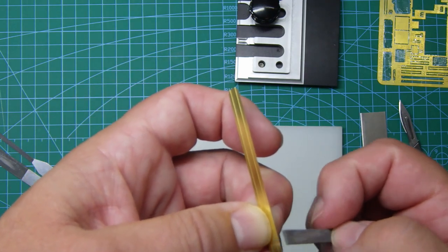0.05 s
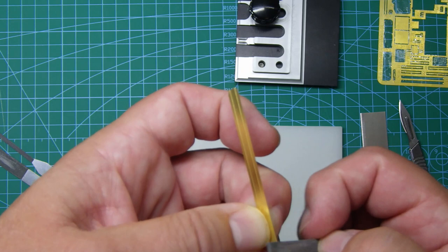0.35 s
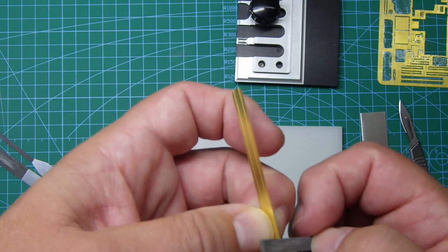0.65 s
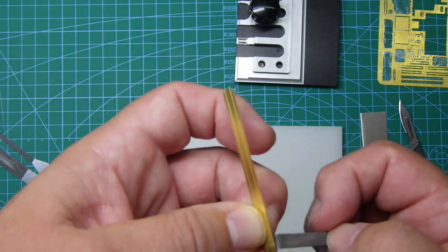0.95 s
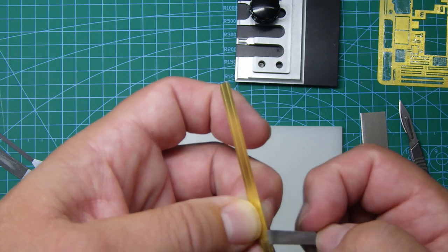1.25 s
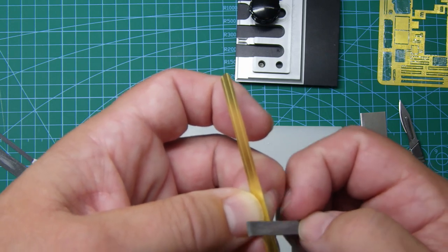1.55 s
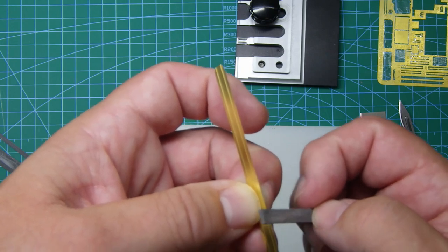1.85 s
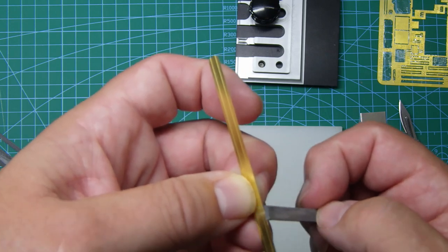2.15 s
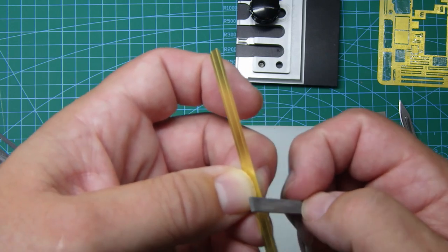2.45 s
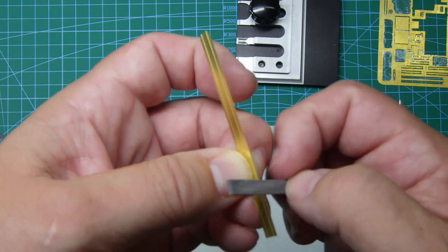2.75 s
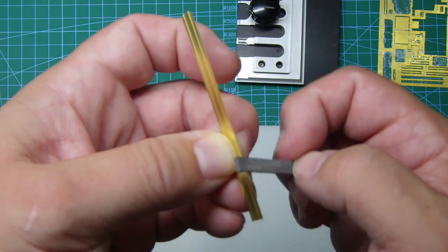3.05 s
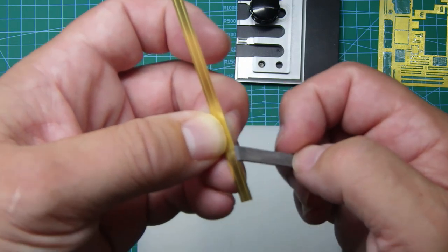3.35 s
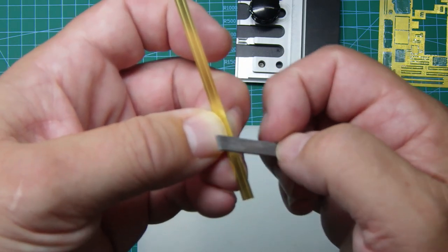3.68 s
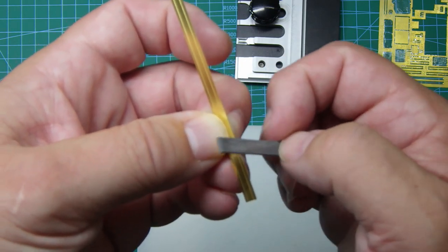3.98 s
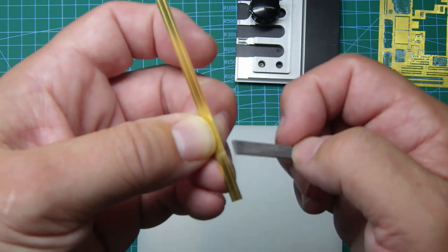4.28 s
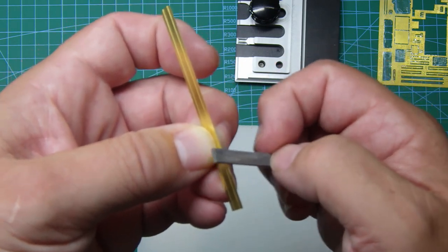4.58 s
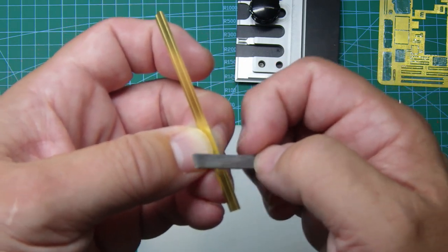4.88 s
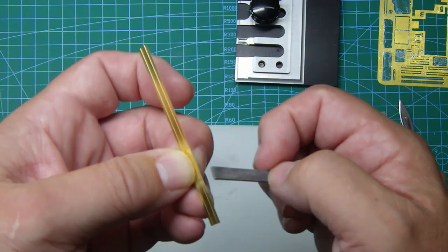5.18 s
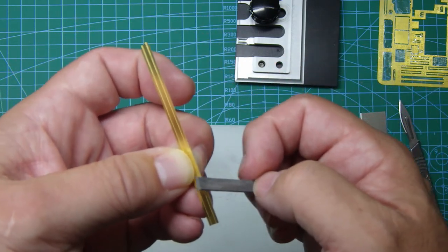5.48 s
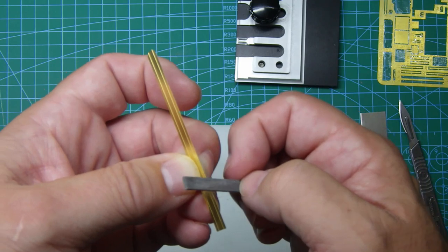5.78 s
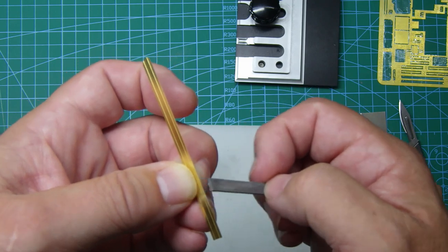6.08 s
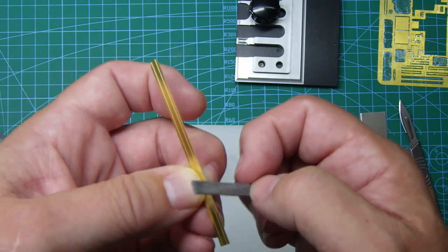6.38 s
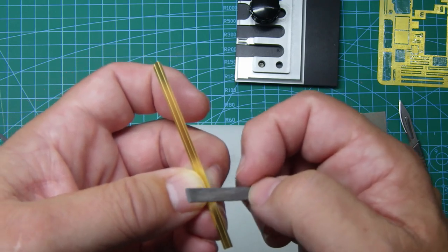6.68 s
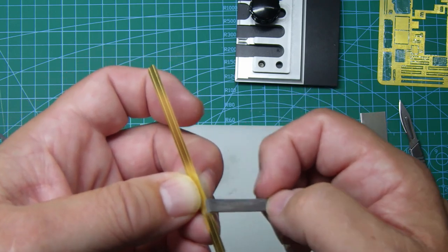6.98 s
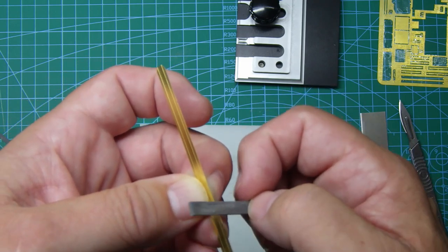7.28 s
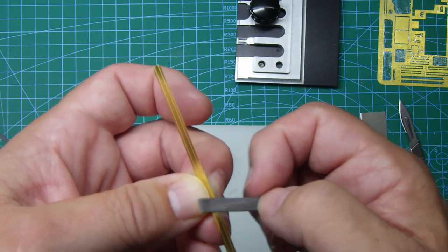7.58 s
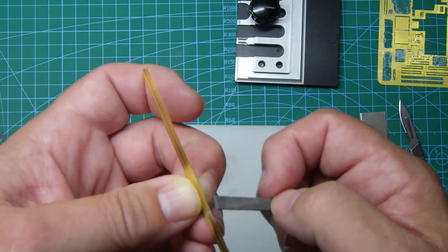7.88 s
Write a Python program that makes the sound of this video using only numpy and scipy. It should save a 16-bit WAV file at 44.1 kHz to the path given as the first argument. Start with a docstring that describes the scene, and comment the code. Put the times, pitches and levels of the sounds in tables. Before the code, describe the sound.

A small sanding stick rasps along a thin brass part in short, light strokes, about two a second, over a quiet workroom hum.

```python
"""Sanding a small brass part

A small sanding stick rasps along a thin brass part held in the fingers, about two light strokes a second.
Each stroke catches, chatters in quick slips and runs out into a smoother scrape. The slips make the part
and the stick ring, and the fingers damp the metal. A quiet workroom hums behind, and the recorder cuts
narrow notches in the treble and gently turns down loud moments."""
import sys
import numpy as np
from scipy import signal
from scipy.fft import rfft, irfft
from scipy.io import wavfile
from scipy.ndimage import uniform_filter1d

SR = 44100
rng = np.random.default_rng(int(sys.argv[2]) if len(sys.argv) > 2 else 0)


def generate_wav(sig):
    """Save sig (samples, or channels by samples) to the path in sys.argv[1] as 16-bit PCM at SR."""
    pcm = np.round(np.clip(np.atleast_2d(sig).T, -1, 1) * 32767).astype(np.int16)
    wavfile.write(sys.argv[1], SR, pcm)


N = 358974

# Levels in the tables are relative: they set the balance, not the final loudness.
# Room air and microphone hiss: (frequency [Hz], level [dB])
AIR_SPECTRUM = [(20, -8), (62, 1.5), (150, -3), (260, -8), (450, -11), (760, -2.5), (1200, -8),
                (1800, -13.5), (2150, -23.5), (3000, -29), (5200, -31), (8000, -27.5), (14400, -22),
                (15800, -27.5)]
# Damped resonances (modes) of the part and the stick, from low to high:
# (frequency [Hz], width [Hz], level [dB])
RING_MODES = [(834, 600, -23), (1212, 141, -8), (1623, 165, -2.5), (1783, 94, 1)]
SCRAPE_MODES = [(2204, 580, -9.5), (2570, 295, -5), (2930, 170, -7), (3424, 320, -3.5), (3850, 320, 3.5),
                (4320, 580, 0), (4650, 756, 1)]
RASP_MODES = [(4846, 270, -3.5), (6353, 364, 3.5), (6630, 490, 1), (7700, 1240, -14)]
FIZZ_MODES = [(8900, 1800, -3), (10170, 730, -0.5), (10950, 150, 3), (13100, 7800, -13.5)]
# Longer-ringing modes of the part's free end: (frequency [Hz], time to fade by 60 dB [s], level [dB])
FREE_END_MODES = [(1815, 0.046, -4), (3896, 0.047, -1), (4150, .04, -16), (9160, 0.035, -15),
                  (10100, 0.036, -12), (11300, 0.077, -15), (14190, 0.11, -20)]
# The grip moves from the end to the middle and damps the part: (time [s], free end's level [dB])
GRIP_LEVELS = [(0, -8.5), (1.9, -11), (3.0, -13), (8.1, -18)]
# The stick touches down or snags on an edge:
# (time [s], scrape peak [dB], ring against scrape [dB], rasp against scrape [dB])
SNAG_EVENTS = [(0.4395, -21.5, -11.5, 1), (0.769, -31, -5, -10), (0.793, -21.5, -15, -22),
               (0.9345, -13.5, -29, -18), (1.6392, -39, -4, -12), (1.704, -19, -4, -13),
               (1.7856, -17, -20, -10), (2.0707, -39, -12, -8), (2.185, -19, -3, -6),
               (2.4553, -34.5, -11, -14), (2.4987, -25, -10, -7), (2.6511, -16, -21, -21),
               (2.8768, -30.5, -8, -14), (2.984, -26, -15, -9), (3.004, -16, -9, -8),
               (3.293, -32.5, -13, -11), (3.3196, -23, -13, -2), (3.3347, -25, -7.5, 6),
               (3.341, -15.5, -20, -4), (3.7394, -21, -22, -9), (4.146, -32.5, -21, -22),
               (4.2128, -23, -19, -1.5), (4.597, -26.5, -17, -12), (4.6309, -33, 0, -2),
               (4.9927, -23, -23, -11), (5.018, -28, -22, -17), (5.043, -17.5, -23, -18),
               (5.886, -30.5, -19, -16), (6.869, -39, -18, -17), (6.9145, -21.5, -2.5, -12),
               (6.9326, -23, -1, -5), (6.9428, -21, -8, -4), (6.9586, -21.5, -14, -9),
               (7.3276, -28, -11, -14), (7.3484, -28, -1, -10), (7.712, -30.5, -17, -16),
               (7.7478, -16, -16, -9), (7.7826, -20, -8, -15), (7.7988, -22, -20, -16),
               (8.12, -32, -20, -5)]
# Each stroke bites, may ease off, pushes, then lifts:
# (start [s], length [s], fade-in [s], push after start [s], bite [dB], easing [dB], push [dB],
#  extra ring [dB], extra rasp [dB], extra fizz [dB], starting slip rate [1/s])
STROKE_EVENTS = [ (0.000, 0.1, 0.0025, 0.045, -32.5, 3.5, -34, 3.5, 2, -2, 177),
                 (0.331, 0.21, .0035, 0.15, -41.5, 1.5, -33.5, 5.5, 1.5, 1.5, 143),
                 (0.7938, 0.16, .004, .146, -40.5, -2.5, -35, 0, -1.5, -2.5, 136),
                 (1.219, .182, .002, 0.15, -42, 1, -28, 2.5, 2.5, 0, 138),
                 (1.661, 0.18, 0.028, 0.1, -41.5, 0, -28.5, -1, -.5, -2, 148),
                 (2.076, 0.2, 0.013, 0.14, -41, 0, -29.5, 0, -.5, -4, 149),
                 (2.49, .194, 0.0089, 0.18, -34, 1, -37, 2.5, 2, -1.5, 122),
                 (2.895, .193, .0025, 0.14, -39.5, 5.5, -32.5, 2, 2, 0, 113),
                 (3.306, 0.19, 0.054, 0.17, -31.5, 2, -34, -2.5, -1, -4, 145),
                 (3.715, 0.18, 0.012, 0.16, -36, 0, -34, -4, -1.5, -1, 149),
                 (4.190, 0.16, 0.032, 0.09, -38.5, 5, -31, 0.5, 2, -1.5, 154),
                 (4.626, 0.15, 0.0036, 0.099, -52.5, -4, -28, -3.5, -0.5, -1.5, 145),
                 (5.026, 0.15, .004, 0.12, -49.5, 9, -25, 0.5, 3.5, 2, 160),
                 (5.477, .160, .003, 0.081, -56.5, 6.5, -42, 0, 0, -2, 146),
                 (5.917, .171, 0.012, 0.14, -36.5, 4.5, -34.5, -2.5, -3, -3.5, 160),
                 (6.402, 0.061, .003, 0.037, -60, 16, -55.5, 0, -1, 0, 135),
                 (6.928, 0.2, 0.0033, 0.14, -43.5, 2, -31, -1, -2, -1.5, 106),
                 (7.348, 0.16, 0.0034, 0.12, -35.5, 4, -29, -2.5, -2, -1.5, 130),
                 (7.748, .170, .003, 0.13, -40.5, 1, -37, 0, -1.5, -3.5, 80)]
# Bands that the recorder cuts out: (frequency [Hz], width [Hz])
RECORDER_NOTCHES = [(3180, 686), (4070, 113), (5125, 1050), (5680, 600), (7120, 370), (8170, 110)]

# Usual share against the scrape: (level at mid-stroke [dB], change over the stroke [dB])
RING_SHARE, RASP_SHARE, FIZZ_SHARE = (-8.5, -6), (-7, -8.5), (-14.5, -9)
RELEASE_S = 0.0087
GRID_HZ = np.fft.rfftfreq(4096, 1 / SR)


def gain_of(db):
    """Turns decibels into a factor to multiply a sound by."""
    return 10 ** (np.asarray(db) / 20)


def unit_rms(x):
    """Scales a sound so that its average level (rms) is 1."""
    return x / np.sqrt(np.mean(x ** 2) + 1e-20)


def steadied(x, window_s):
    """Holds the average level near 1, leaving bursts shorter than the window as they are."""
    size = int(window_s * SR / 2)
    power = uniform_filter1d(uniform_filter1d(x ** 2, size), size)
    return x / np.sqrt(abs(power) + 1e-12)


def add(mix, start_s, sound):
    """Mixes a sound in at its start time."""
    part = mix[round(start_s * SR):][:len(sound)]
    part += sound[:len(part)]


def drift(samples, per_s):
    """A wandering curve that heads for a new random value per_s times a second."""
    points = rng.standard_normal(int(samples / SR * per_s) + 3)
    return unit_rms(np.interp(np.arange(samples) / SR * per_s, np.arange(len(points)), points))


def click_response(modes):
    """The sound that a set of resonances makes after one click."""
    power = sum(gain_of(db) ** 2 / (1 + ((GRID_HZ - hz) / (width / 2)) ** 2 / 2) ** 2
                for hz, width, db in modes)
    log_gain = np.log(np.r_[power, power[-2:0:-1]] + 1e-10) / 2
    spectrum = np.exp(np.conj(signal.hilbert(log_gain)))  # puts the ringing after the click
    ringing = np.fft.ifft(spectrum).real[:len(GRID_HZ)]
    return ringing / np.linalg.norm(ringing)


def background(air_db=-47, whine_db=-70.5, whine_hz=9200, waver_hz=14):
    """Steady fan-like air, with a thin, wavering electronic whine."""
    hz, db = np.transpose(AIR_SPECTRUM)
    shape_db = np.interp(np.log(np.fft.rfftfreq(N, 1 / SR) + 1), np.log(hz), db)
    air = irfft(rfft(rng.standard_normal(N)) * gain_of(shape_db), N)
    pitch_hz = whine_hz + waver_hz * drift(N, per_s=51)
    whine = np.sin(2 * np.pi * np.cumsum(pitch_hz) / SR)
    return gain_of(air_db) * unit_rms(air) + gain_of(whine_db) * unit_rms(whine)


def room(x, early_db=-13, early_fade_s=0.11, tail_db=-23, tail_fade_s=0.3, dull_hz=7000):
    """The bench and hands reflect the sound at once; the small room leaves a faint, dull tail."""
    t = np.arange(SR // 2) / SR
    bounces = rng.standard_normal((2, len(t))) * (rng.random((2, len(t))) < 0.08) * (t > 0.0015)
    early = bounces[0] * gain_of(-60 * t / early_fade_s)
    tail = bounces[1] * gain_of(-60 * t / tail_fade_s)
    echo = gain_of(early_db) * early / np.linalg.norm(early)
    echo += gain_of(tail_db) * tail / np.linalg.norm(tail)
    echo = signal.lfilter(*signal.butter(1, dull_hz, fs=SR), echo)
    return x + signal.fftconvolve(x, echo)[:N]


def grain_crack(start_s=5.1425, peak_db=-16, hz=13100, width_hz=1000):
    """A grain breaks off in the hardest stroke with one very high, short tick."""
    out = np.zeros(N)
    tick = click_response([(hz, width_hz, 0)])
    add(out, start_s, gain_of(peak_db) * tick / abs(tick).max())
    return out


def snags(trim_db=-1, fizz_below_rasp_db=7, crunch_s=0.00096, crunch_db=-9):
    """Each snag is one hard slip: a jolt and a brief crunch of grit set the resonances ringing."""
    out, t = np.zeros(N), np.arange(len(GRID_HZ)) / SR
    bodies = [click_response(modes) for modes in (SCRAPE_MODES, RING_MODES, RASP_MODES, FIZZ_MODES)]
    for start_s, peak_db, ring_db, rasp_db in SNAG_EVENTS:
        crunch = gain_of(crunch_db) * rng.standard_normal(len(t)) * np.exp(-t / crunch_s)
        force = (t == 0) + crunch
        voices = np.array([unit_rms(signal.fftconvolve(force, body)) for body in bodies])
        shares = gain_of([0, ring_db, rasp_db, rasp_db - fizz_below_rasp_db])
        add(out, start_s, gain_of(peak_db + trim_db) * (shares @ voices) / abs(voices[0]).max())
    return out


def free_end(force):
    """The part's free end rings on briefly after the force, more quietly as the grip moves."""
    t = np.arange(len(GRID_HZ)) / SR
    ring = sum(gain_of(db) * unit_rms(gain_of(-60 * t / fade_s) * np.sin(2 * np.pi * hz * t))
               for hz, fade_s, db in FREE_END_MODES)
    grip_db = np.interp(np.arange(N) / SR, *np.transpose(GRIP_LEVELS))
    return signal.fftconvolve(force * gain_of(grip_db), ring / np.linalg.norm(ring))[:N]


def friction(samples, first_per_s, last_per_s=215, jitter=0.33, slip_s=0.00087, jolt_db=6):
    """Stick and slip: each slip is a jolt and a burst of grit; they merge as the stick speeds up."""
    pace = np.linspace(first_per_s, last_per_s, samples)
    slips_per_s = pace * np.exp(jitter * drift(samples, per_s=200))
    slip_number = (np.cumsum(slips_per_s) / SR).astype(int)
    since_slip_s = (np.arange(samples) - np.searchsorted(slip_number, slip_number)) / SR
    strength = gain_of(2 * rng.standard_normal(samples))[slip_number]
    grit = rng.standard_normal(samples) * gain_of(1.6 * rng.standard_normal(samples))
    slips = gain_of(jolt_db) * (since_slip_s == 0) + np.exp(-since_slip_s / slip_s) * grit
    # between slips the grit drags on, more so the faster they come
    drag = gain_of(-7 + 19 * np.log2(pace / last_per_s))
    return strength * slips + drag * grit


def rubbed(force, modes, wander_db=3, darken_db=6, sing_hz=4100, reach_hz=300, sing_rise_db=4.8):
    """The contact point moves: each mode swells and fades, high ones sink, those near sing_hz grow."""
    out, progress = np.zeros(len(force)), np.linspace(-0.5, 0.5, len(force))
    for k, (hz, width, db) in enumerate(modes):
        resonator = signal.iirpeak(hz, hz / (width * np.sqrt(2)), fs=SR)
        ringing = signal.lfilter(*resonator, signal.lfilter(*resonator, force))
        tilt_db = -darken_db * progress * np.log2(hz / modes[0][0])
        sing_db = sing_rise_db * progress * np.exp(-((hz - sing_hz) / reach_hz) ** 2)
        share = gain_of(db + tilt_db + sing_db + wander_db * drift(len(force), per_s=33.4))
        out += (-1) ** k * share * ringing  # neighbouring modes move in opposite directions
    return out


def effort_db(t, length_s, push_s, bite_db, ease_db, push_db, lift_db=-18):
    """The hand's effort in a stroke: it bites, may ease off, pushes, then lifts ever faster."""
    rise = np.clip(t / push_s, 0, 1)
    lift = np.clip((t - push_s) / max(length_s - push_s, RELEASE_S), 0, 1)
    dip_db = ease_db * np.sin(np.pi * rise) ** 2
    return bite_db + (push_db - bite_db) * rise - dip_db + lift_db * lift ** 1.84


def strokes(boost_db=3, tremor_db=0.67, wander_db=0.6):
    """One friction force drives the scrape, the ring, the rasp, the fizz and the free end."""
    out, end_force = np.zeros(N), np.zeros(N)
    for (start_s, length_s, fade_in_s, push_s, bite_db, ease_db, push_db,
         ring_db, rasp_db, fizz_db, slips_per_s) in STROKE_EVENTS:
        t = np.arange(0, length_s, 1 / SR)
        level_db = effort_db(t, length_s, push_s, bite_db, ease_db, push_db)
        level_db += tremor_db * drift(len(t), per_s=58.4)
        fades = np.minimum(t / fade_in_s, 1) * np.minimum((length_s - t) / RELEASE_S, 1)
        pressure = gain_of(level_db) * fades
        force = friction(len(t), slips_per_s)
        add(end_force, start_s, pressure * unit_rms(force))
        voices = [(SCRAPE_MODES, 0, (0, 0)), (RING_MODES, ring_db, RING_SHARE),
                  (RASP_MODES, rasp_db, RASP_SHARE), (FIZZ_MODES, fizz_db, FIZZ_SHARE)]
        for modes, extra_db, (usual_db, change_db) in voices:
            share_db = boost_db + extra_db + usual_db + change_db * (t / length_s - 0.5)
            share_db += wander_db * drift(len(t), per_s=29.6)
            # the hand keeps its pressure steady over a few slips
            voice = steadied(rubbed(force, modes), window_s=0.061)
            add(out, start_s, pressure * gain_of(share_db) * voice)
    return out + free_end(end_force)


def scene():
    """Strokes, snags and one breaking grain at the bench, over the background."""
    sanding = strokes() + snags() + grain_crack()
    return (room(sanding) + background())[None]


def record(dry, threshold_db=-29, squeeze=0.66, fall_db_per_s=12, top_hz=15700):
    """The recorder cuts its notches, turns down after loud moments and drops the highest treble."""
    x = dry[0]
    for hz, width in RECORDER_NOTCHES:
        x = signal.lfilter(*signal.iirnotch(hz, hz / width, fs=SR), x)
    power_db = 10 * np.log10(abs(uniform_filter1d(x ** 2, size=900)) + 1e-12)
    fall_db = np.arange(N) / SR * fall_db_per_s
    held_db = np.maximum.accumulate(power_db + fall_db) - fall_db  # jumps up, then sinks slowly
    over_db = np.maximum(held_db - threshold_db, 0)
    x = x / gain_of(squeeze * uniform_filter1d(over_db, size=200))
    low_pass = signal.firwin(401, top_hz, window=("kaiser", 8), fs=SR)
    return signal.oaconvolve(x, low_pass, "same")[None]


dry = scene()
out = record(dry)
generate_wav(out)
```